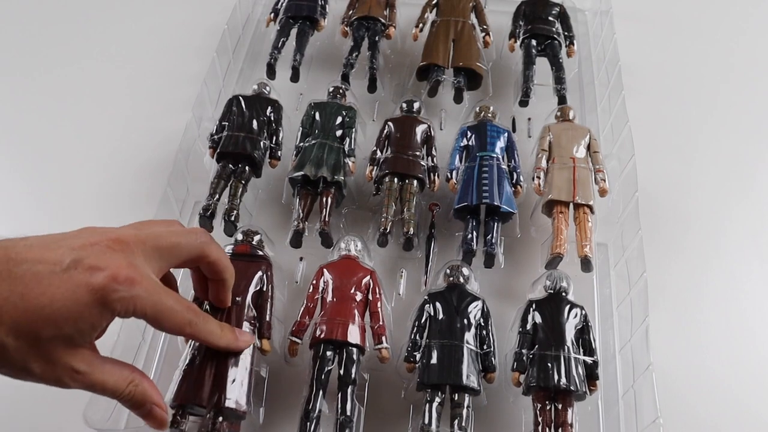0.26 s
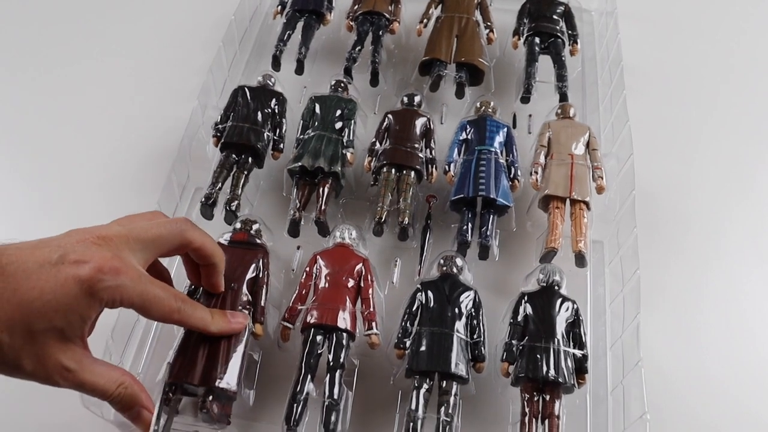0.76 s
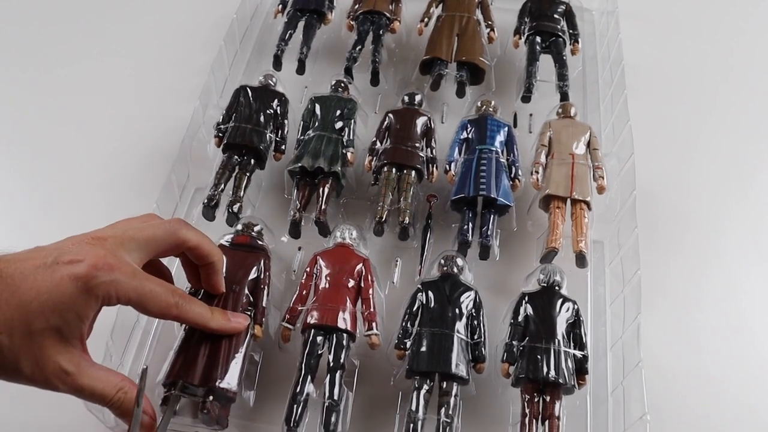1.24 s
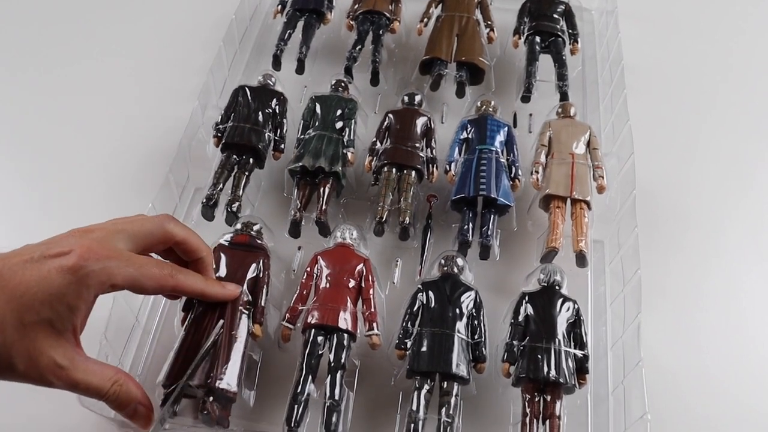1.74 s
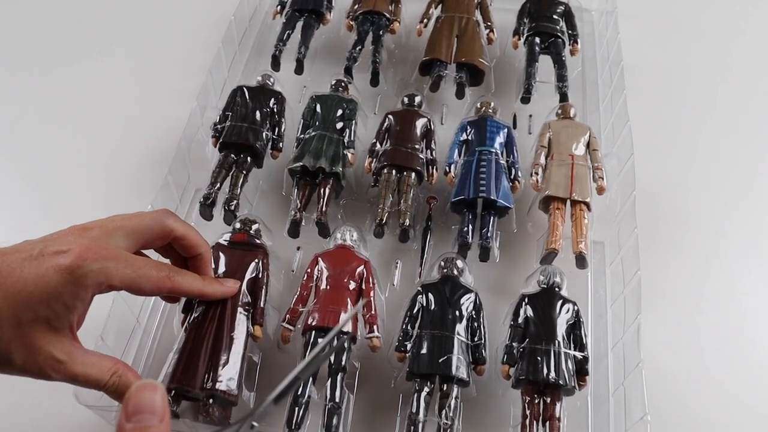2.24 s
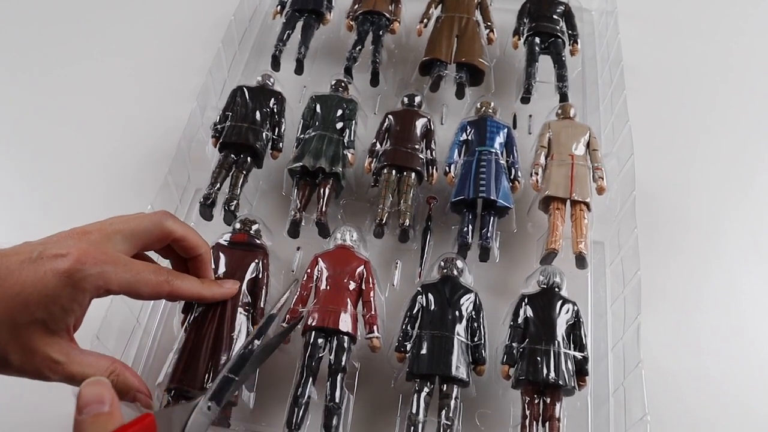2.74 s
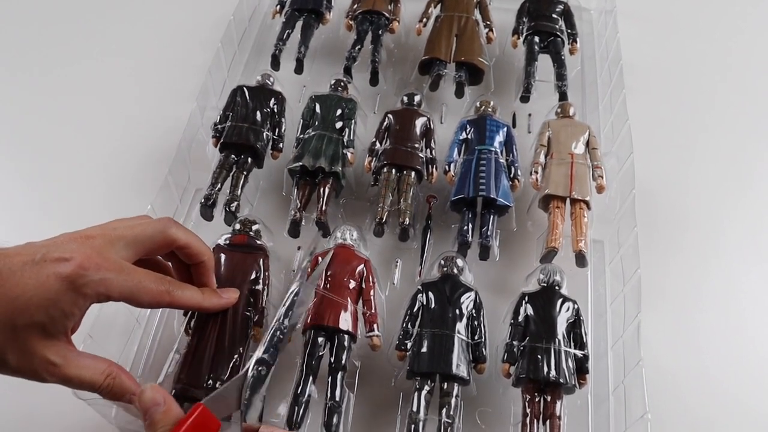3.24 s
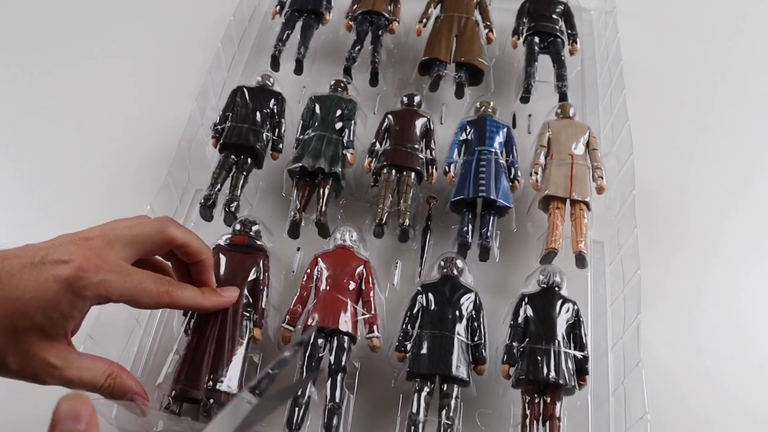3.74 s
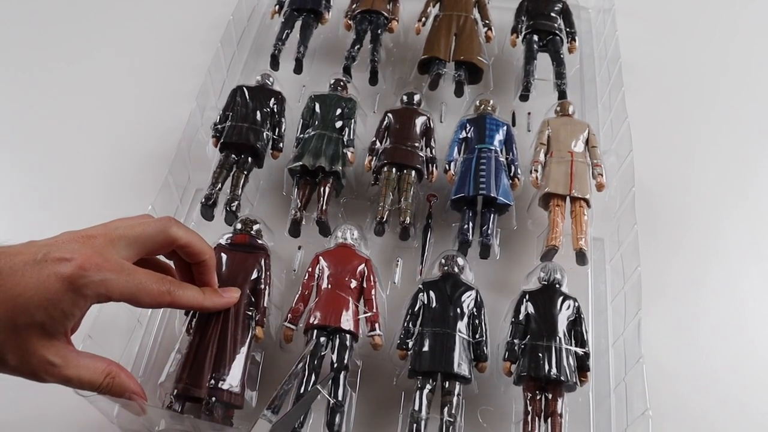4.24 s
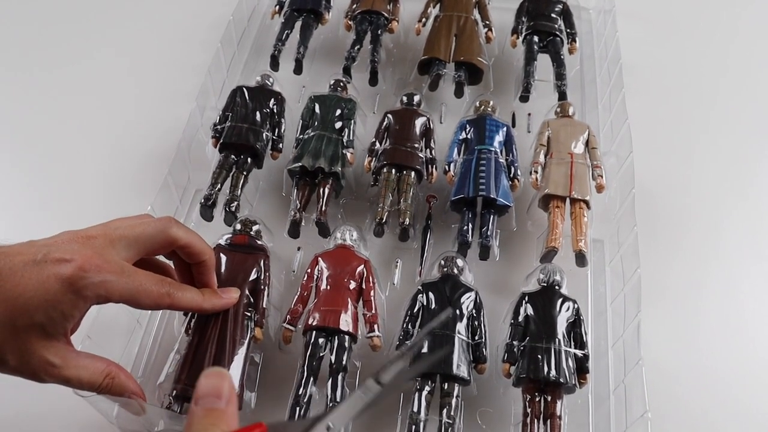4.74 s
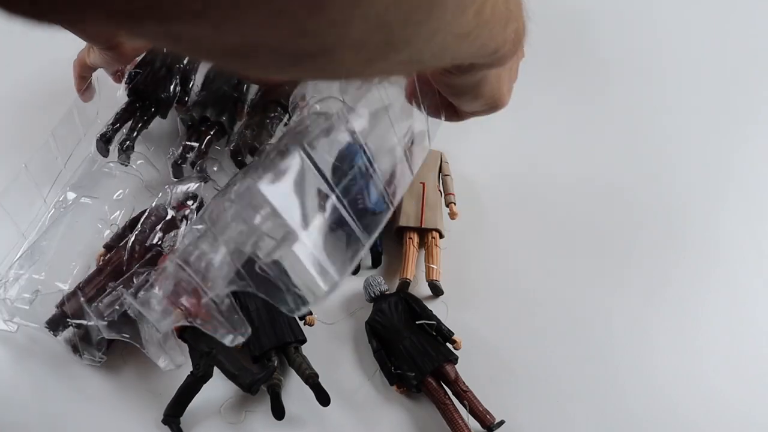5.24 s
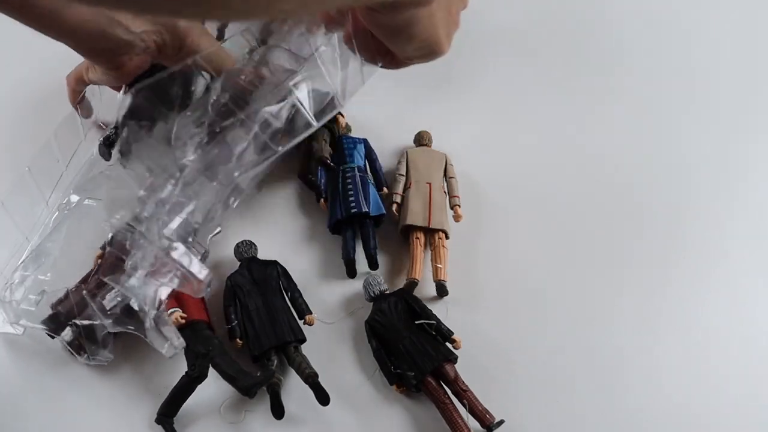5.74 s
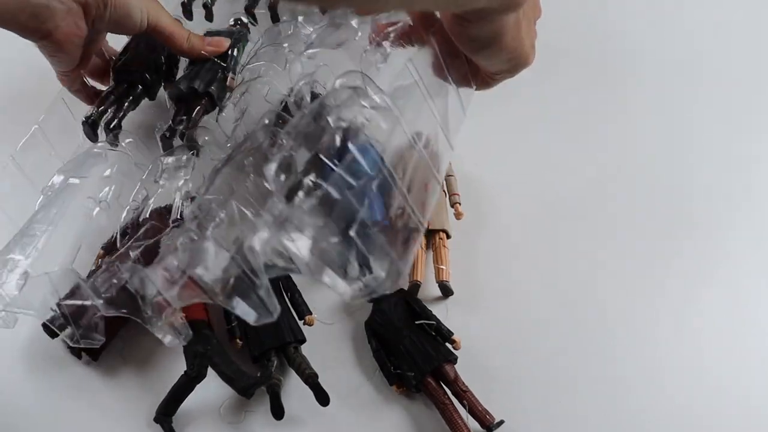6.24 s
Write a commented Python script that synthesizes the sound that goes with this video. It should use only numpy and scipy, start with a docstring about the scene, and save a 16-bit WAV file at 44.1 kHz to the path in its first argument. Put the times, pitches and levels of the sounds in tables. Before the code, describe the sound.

Brittle plastic sheet buckling in uneven clusters, each a short mid-pitched pop with a bright crease and small low thump. Brief scrapes and fine crinkling fill the gaps, thinning for moments near two and just before five seconds. Later flexing sounds slightly lower and hollow. Recorded close, in stereo, with short hard reflections and soft table thuds.

```python
"""A rigid plastic blister tray buckles as a hand presses it on a table and scissors snip ties;
then it is bent to shake figures out. Each buckle is a short burst with its own pitch, a bright crease and
a short low thump. Some dents ring clearly or give a sharp dry click; between buckles the sheet crackles,
scrapes and once hums. The tray's cavities and the table top ring when struck, and a small hard room
answers over a quiet room tone."""
import sys
import numpy as np
from scipy import signal
from scipy.fft import rfft, irfft, next_fast_len
from scipy.io import wavfile
from scipy.ndimage import uniform_filter1d

SR = 44100
rng = np.random.default_rng(int(sys.argv[2]) if len(sys.argv) > 2 else 0)


def to_wav(s):
    """Save 16-bit WAV."""
    ch = np.atleast_2d(s).T  # columns
    pcm = np.round(np.clip(ch, -1, 1) * 32767)  # PCM
    wavfile.write(sys.argv[1], SR, pcm.astype(np.int16))


N = 285649

# The sheet buckles or a tie is snipped: start_s, peak_db, pitch_hz, blow_db (into the cavities),
# bright_db (mean crease level, about 1.2-8.6 kHz), top_db (the same above about 5.6 kHz)
# [s, dB, Hz, dB, dB, dB]
BUCKLES = [(0.037, -21, 980, -44, -56, -48), (0.262, -18.5, 1590, -31.5, -34, -39.5),
           (0.359, -6, 1040, -34, -40, -41), (0.37, -9.5, 2320, -32, -36, -31),
           (0.445, -6, 1500, -17, -48, -41), (0.484, -33, 3500, -49, -28, -49),
           (0.497, -19, 1750, -36, -40, -60), (0.504, -10.5, 1340, -46, -47, -61),
           (0.511, -16, 1110, -57, -25, -43), (0.531, -27, 880, -20, -22.5, -20),
           (0.574, -16, 2940, -35, -30, -25.5), (0.592, -9.5, 2160, -28, -25, -35),
           (0.775, -11, 1100, -21, -18.5, -27.5), (0.852, -8, 1545, -25, -55, -50),
           (0.862, -8, 1500, -31, -37, -43), (0.886, -11.5, 905, -29.5, -51.5, -58),
           (0.916, -7.5, 1274, -27.5, -22.5, -27), (1.031, -8.5, 1070, -33, -19, -26),
           (1.08, -13, 980, -25.5, -57, -51), (1.155, -10, 1360, -29.5, -60.5, -61),
           (1.18, -7, 960, -29, -23, -32), (1.242, -2.5, 1300, -16.5, -47, -67),
           (1.264, -2, 1510, -32, -22, -30.5), (1.305, 0, 1330, -18.5, -11.5, -17.5),
           (1.507, -10, 725, -23, -32.5, -43), (1.591, -14.5, 2100, -33, -42, -37),
           (1.622, -8.5, 735, -31, -22, -27.5), (1.652, -7, 2220, -26, -39, -33),
           (1.783, -24, 1080, -46, -36, -41), (1.821, -3.5, 3720, -25, -9.5, -7.5),
           (1.948, -6.5, 1180, -31, -27, -37), (2.02, -44, 1040, -51, -32.5, -43),
           (2.077, -19, 5540, -55, -34.5, -19.5), (2.214, -22, 1670, -35, -33.5, -34),
           (2.396, -24, 1620, -41.5, -37.5, -44), (2.477, -23, 1580, -42, -32.5, -39),
           (2.711, -5, 1590, -29.5, -25, -32.5), (2.845, -6, 1600, -23, -50, -50),
           (2.853, -6, 1750, -29.5, -46, -52), (2.896, -22, 683, -35, -24.5, -28),
           (2.913, -22, 3800, -41, -31, -35), (2.948, -22, 1500, -30, -49, -55),
           (3.01, -14, 1540, -36, -41, -46), (3.017, -15, 700, -28, -38, -57),
           (3.05, -7, 820, -31, -56, -77), (3.088, -5, 2160, -30.5, -21, -29.5),
           (3.123, -4, 990, -44.5, -39.5, -28.5), (3.128, -11, 1470, -25, -45, -44),
           (3.142, 6.5, 2090, -37, -27, -26.5), (3.332, -1, 1100, -20, -9.5, -11.5),
           (3.355, -20, 1700, -34, -34, -48), (3.408, 2.5, 2050, -15.5, -14, -27),
           (3.724, -34, 1500, -58, -37, -42), (3.782, -22.5, 1070, -32, -70, -71),
           (3.872, -25.5, 1030, -38.5, -41.5, -50), (3.947, -15, 2470, -35, -49, -42),
           (4.043, -10, 2390, -30, -23, -30), (4.057, -2.5, 1750, -22.5, -43, -32),
           (4.086, -9, 1880, -33.5, -55, -41), (4.142, -15.5, 1700, -25, -26.5, -54),
           (4.216, -9.5, 1800, -33, -37, -56), (4.228, -23, 2600, -28.5, -31, -38.5),
           (4.29, -11.5, 3440, -61, -27, -26), (4.317, -13, 1810, -31, -23.5, -31),
           (4.348, -16.5, 1100, -28, -34, -36), (4.505, -9.5, 2100, -31, -13.5, -38),
           (4.513, 8, 1680, -30, -16.5, -6.5), (4.564, -13.5, 1080, -48, -28.5, -47),
           (4.582, -12.5, 1900, -37, -35, -51), (4.648, -19.5, 1660, -36.5, -32, -64),
           (4.875, -28.5, 666, -52, -48.5, -47), (4.944, -16.5, 680, -38, -37, -39),
           (4.968, -8.5, 1860, -26.5, -39, -56), (5.221, -5.5, 960, -27, -28, -39),
           (5.303, -15, 640, -53, -59, -65), (5.319, -8, 1730, -26, -25.5, -50),
           (5.343, -12.5, 1110, -56, -20.5, -21.5), (5.479, -11.5, 2450, -29, -57, -64),
           (5.521, -18, 1450, -35, -29.5, -54), (5.539, -6, 740, -32, -26, -35),
           (5.579, -12.5, 1210, -37, -58, -65), (5.615, -19, 1120, -31, -57, -60),
           (5.627, -14, 2510, -28.5, -28.5, -56), (5.676, -16, 1500, -21, -28, -35),
           (5.702, -6.5, 1630, -51, -24.5, -31), (5.864, -14.5, 1550, -69, -64, -58),
           (5.907, -13, 1570, -44, -45, -48), (5.99, -10, 1800, -36.5, -27, -25),
           (6.05, -16.5, 730, -35, -42, -56), (6.334, -27, 650, -31.5, -38.5, -44.5),
           (6.394, -12, 970, -32, -34, -42.5), (6.409, -9, 930, -38, -29, -48),
           (6.446, -5.5, 1600, -44, -25.5, -26.5)]


def amp(db):
    """Turn decibels into a gain."""
    return 10 ** (np.asarray(db) / 20)


def rms_one(x):
    """Scale to an rms of 1."""
    return x / np.sqrt(np.mean(x ** 2) + 1e-20)


def peak_one(x):
    """Scale to a peak of 1."""
    return x / (np.abs(x).max() + 1e-20)


def in_time(rows):
    """Read each column of a table between its points, with a value at every sample."""
    s, *columns = np.transpose(rows)
    return [np.interp(np.arange(N) / SR, s, column) for column in columns]


def at_hz(points, hz):
    """Read a table between its points, on a logarithmic pitch axis."""
    table_hz, values = np.array(points).T
    return np.interp(np.log(hz), np.log(table_hz), values)


def band(x, low_hz, high_hz):
    """Keep mainly the sound between two pitches."""
    edges = [low_hz, min(high_hz, .45 * SR)]
    return signal.sosfilt(signal.butter(2, edges, "band", fs=SR, output="sos"), x)


def ring(force, hz, t60):
    """A resonance: a unit click starts a sine of height 1 that falls 60 dB in t60 seconds."""
    decay, turn = amp(-60 / (t60 * SR)), 2 * np.pi * hz / SR
    return signal.lfilter([0, np.sin(turn)], [1, -2 * decay * np.cos(turn), decay * decay], force + 1e-18)


def stereo_noise(size, gain):
    """Noise in half-octave bands, more alike left and right in the bass; gain(hz) shapes each band."""
    # Left-right likeness of reflected sound: pitch_hz, likeness (1 = identical) [Hz, ratio]
    likeness = [(100, 0.86), (300, 1), (700, 0.45), (1500, 0.12), (3000, 0)]
    edges_hz = 30 * 2 ** np.arange(0, 9.3, .5)
    white = rng.standard_normal((2, 2, size))
    out = 0
    for k, (low, high) in enumerate(zip(edges_hz, edges_hz[1:])):
        mid, side = band(white[k % 2], low, high)
        hz = np.sqrt(low * high)
        alike = np.clip(at_hz(likeness, hz), -1, 1)
        stereo = np.sqrt(1 + alike) * mid + np.sqrt(1 - alike) * side * [[1], [-1]]
        out = out + gain(hz) * stereo
    return out


def strike(events, modes, spread_db, wander=0.0, late_pitch=1.0):
    """Every blow rings every mode with a random strength; pitches wander as the body flexes."""
    lift_s = 4.9      # from here on the pitches are multiplied by late_pitch
    size = SR // 2
    t, out = np.arange(size) / SR, np.zeros(N + size)
    hz, level_db, t60 = np.transpose(modes)[:, :, None]
    signs = (-1) ** np.arange(len(modes))[:, None]
    for s, db in events:
        strength, flex = rng.standard_normal((2, len(modes), 1))
        pitch = hz * np.exp(wander * flex) * (late_pitch if s > lift_s else 1)
        height = amp(db + level_db + spread_db * strength - 60 * t / t60)
        at = round(s * SR)
        out[at:at + size] += np.sum(signs * height * np.sin(2 * np.pi * pitch * t), axis=0)
    return out[:N]


def room_tone():
    """Steady stereo noise with the room's own colour, lower towards the end."""
    # Colour of the room tone: pitch_hz, relative level_db per Hz [Hz, dB]
    colour = [(35, -36.5), (60, 14), (294, 17), (666, 24.5), (785, -34), (7750, 6.5), (16000, -8.5)]
    level_db, late_s, late_drop_db = -57.5, 5.9, 8
    late = np.arange(N) > late_s * SR
    noise = stereo_noise(N, lambda hz: amp(at_hz(colour, hz)))
    return amp(level_db - late_drop_db * late) * rms_one(noise)


def table():
    """Pushes strike the table top's modes; shifting hands keep the same modes murmuring."""
    # Modes of the table top: pitch_hz, relative level_db, t60_s [Hz, dB, s]
    modes = [(112, -11, 0.75), (154.2, -2, 0.59), (183.6, 6, 0.22), (241, 5, 0.097)]
    # Pushes that reach the table: start_s, relative level_db [s, dB]
    thumps = [(0.449, -41.5), (0.529, -36), (1.304, -43.5), (1.499, -43), (2.715, -41), (2.849, -44),
              (3.321, -40), (3.41, -35), (4.089, -42.5), (4.219, -48), (4.509, -40.5), ]
    # Hands shifting on the table: time_s, level_db [s, dB]
    rumble = [(0.0, -53), (0.61, -48), (2.61, -53), (3.34, -52), (3.73, -58), (4.49, -50.5), (4.67, -56.5),
              (6.48, -65)]
    shifting = rng.standard_normal(N) + 0.5 * rng.standard_normal((2, N))
    fits_and_starts = rms_one(band(rng.standard_normal(N), 1.76, 14))
    shifting = shifting * amp(5.0 * fits_and_starts)
    murmur = sum(amp(db) * rms_one(ring(shifting, hz, 0.95 * t60)) for hz, db, t60 in modes)
    murmur = amp(in_time(rumble)[0]) * rms_one(band(murmur, 41, 290))
    blows = strike(thumps, modes, spread_db=5.5, wander=0.015)
    pushes = signal.lfilter([.04], [1, -.96], blows)      # soft contact dulls them
    return pushes * amp([[.3], [-.3]]) + murmur      # pushes are slightly louder on the left


def low_thumps():
    """Each buckle comes with a short low thump, far stronger for loud ones; a few dull thuds sound alike."""
    # Dull low thuds: start_s, relative level_db [s, dB]
    thuds = [(0.889, -24), (0.948, -19.5), (1.029, -29)]
    thump_db, follows, thump_s = -27, 2.3, 0.00095      # for a 0 dB buckle; dB per dB of buckle; seconds
    push, events = np.zeros((2, N)), np.array(BUCKLES)
    uneven_db = 4.2 * rng.standard_normal((len(events), 2)).T      # left and right each get their own share
    starts = (events[:, 0] * SR).astype(int)
    push[:, starts] = amp(thump_db + follows * events[:, 1] + uneven_db)
    for s, db in thuds:
        push[:, round(s * SR)] = amp(db + 4.1 * rng.standard_normal(2))
    rounded = signal.lfilter(np.hanning(round(thump_s * SR)), [1], push + 1e-18)
    return band(rounded, 15, 250)


def scrapes():
    """The sheet scrapes, crumples and once hums: clumped uneven slips in a band, with soft ends."""
    # Scrapes and crumples, and from 4.97 s a long hollow hum of the tray near 340 Hz: start_s, length_s,
    # level_db, centre_hz, spread (band edge over centre) [s, s, dB, Hz, ratio]
    stretches = [(0.356, 0.034, -31, 2390, 2.8), (0.589, 0.09, -27.5, 1300, 1.86),
                 (1.377, 0.16, -45.5, 1950, 3.4), (1.825, 0.16, -34.5, 4300, 1.8),
                 (2.466, .13, -38.5, 3530, 3.5), (3.057, 0.066, -26.5, 995, 1.08),
                 (3.142, 0.15, -34, 2210, 1.13), (3.398, 0.036, -15.5, 2120, 1.62),
                 (3.944, 0.084, -36, 1780, 2.3), (4.38, 0.12, -36.5, 2450, 1.85),
                 (4.55, 0.14, -41, 1870, 1.6), (4.938, 0.046, -27, 1290, 2.08),
                 (4.968, .8, -42, 340.3, 1.09), (5.143, 0.14, -35, 1150, 2.14),
                 (5.46, 0.055, -29, 1170, 1.67), (5.621, 0.071, -22.5, 1420, 2.7),
                 (5.784, 0.021, -28.5, 1750, 1.4), (6.35, 0.1, -33, 1190, 2.3)]
    edge_s, per_s, uneven_db, clump_db = 0.0068, 1400.0, 2.0, 3.0
    t, out = np.arange(SR) / SR, np.zeros(N + SR)
    for s, length, level_db, hz, spread in stretches:
        clumps = 2 * np.tanh(rms_one(band(rng.standard_normal(SR), 44, 290)) / 2)
        sizes = amp(uneven_db * np.minimum(rng.exponential(1, SR), 3) + clump_db * clumps)
        slips = sizes * rng.choice([-1, 1], SR) * (rng.random(SR) < per_s / SR)
        fade = np.clip(np.minimum(t, length - t) / edge_s, 0, 1)
        edges = hz / max(spread, 1.03), hz * max(spread, 1.03)
        coloured = band(band(slips, *edges), *edges)
        out[round(s * SR):][:SR] += amp(level_db) * fade * rms_one(coloured)
    return out[:N]


def crackle():
    """Small creases give way at random; each rings a few cycles in some patch of the sheet."""
    # Handling of the sheet: time_s, relative level_db, bright_db (extra treble) [s, dB, dB]
    handling = [(0.0, -50.5, 32), (0.31, -39.5, -4), (0.5, -31.5, 12), (0.96, -46, -4), (1.28, -37.5, 1.5),
                (1.89, -42, 9.5), (2.11, -54, 4.5), (2.44, -45.5, -9), (2.81, -44, 7.5), (3.03, -38.5, -11),
                (3.28, -41.5, 13), (3.39, -28, -11.5), (3.57, -45.5, -21.5), (3.82, -64.5, 28),
                (4.13, -50, -6.5), (4.51, -33.5, 11), (4.71, -72.5, 30.5), (4.94, -51.5, 4),
                (5.14, -34.5, 4), (5.55, -41.5, 5.5), (5.86, -36.5, -8), (6.11, -52, 5), (6.35, -46, -46),
                (6.48, -29.5, 22)]
    # Colour of the crackle: pitch_hz, relative level_db per Hz [Hz, dB]
    colour = [(88, -48), (150, 8), (264, -3.5), (334, -3.5), (484, 2.5), (689, 10), (3490, -4), (4950, -28),
              (16000, -27)]
    per_s, uneven_db, cycles = 4000.0, 1.5, 5.0
    level_db, bright_db = in_time(handling)
    sizes = amp(uneven_db * np.minimum(rng.exponential(1, N), 3.5)) * rng.choice([-1, 1], N)
    creases = sizes * (rng.random(N) < per_s / SR)
    # creases set one another off, so their strength comes in clumps
    clumps = [np.tanh(rms_one(band(white, 8.5, 37.0)) / 2) * 2 for white in rng.standard_normal((7, N))]
    out = 0
    for k, hz in enumerate(np.geomspace(250, 15000, 24)):
        high = np.clip(np.log2(hz / 1500) / 2, 0, 1)      # brightness acts from 1.5 kHz up
        clump_db = 5.5 * clumps[6] + 3.5 * clumps[k // 4]      # the whole sheet, and patches of like pitch
        chosen = rng.random((2, N)) < .15
        struck = creases * chosen * amp(level_db + high * bright_db + clump_db)
        struck[1] = np.where(hz < 2500, struck[0], struck[1])      # long waves are alike left and right
        # with a fixed number of cycles, lower rings have more energy in their band: hz evens this out
        out = out + amp(at_hz(colour, hz)) * hz * ring(struck, hz, cycles / hz)
    return amp(4.0) * out / np.sqrt(np.mean((out / amp(level_db)) ** 2))


def pops():
    """A dent pops through: a short rounded push rings one mode, long enough to sing or just a dry click."""
    # Dents that ring clearly, and sharp dry clicks: start_s, peak_db, pitch_hz, t60_s [s, dB, Hz, s]
    dents = [(0.357, -11.5, 1010, 0.059), (0.4972, -1.5, 1830, 0.0062), (1.835, -17.5, 1030, 0.038),
             (1.984, -16, 538, 0.034), (2.019, -11, 1083, 0.027), (3.058, -9, 1016, 0.028),
             (4.0569, -2, 1820, 0.0036), (4.0852, -0.5, 1920, 0.0098), (4.2152, -3, 1820, 0.0057),
             (4.3166, -5, 1840, 0.0098), (4.581, -2, 1930, 0.0087), (4.646, -17.5, 999, 0.069)]
    out = 0
    for s, peak_db, hz, t60 in dents:
        since_push = np.arange(N) / SR - s - .002
        push = np.exp(-.5 * (since_push / 0.000063) ** 2)
        out = out + amp(peak_db) * peak_one(ring(push, hz, t60))
    return out


def ticks():
    """The crease of each buckle: a very short bright burst, an uneven rattle and a faint settling rustle."""
    apart = 0.71      # share of noise that differs left and right
    t60, rise_s, top_t60, span_s = 0.0063, 0.00016, 1.0, .012      # crease levels are means over span_s
    rattle_db, rattle_t60, settle_db, settle_t60 = -6.0, 0.051, -28.0, 1.0
    facet_db, facet_cycles = -6.0, 12.3
    size, span = 11000, round(span_s * SR)
    t, out = np.arange(size) / SR, np.zeros((2, N + size))
    for s, *_, bright_db, top_db in BUCKLES:
        common, left, right, uneven = rng.standard_normal((4, size))
        rattle = amp(rattle_db - 60 * t / rattle_t60 + 3.7 * uniform_filter1d(uneven, size=60))
        settle = amp(settle_db - 60 * t / settle_t60) * (1 - t / t[-1])
        # creases lie all over the sheet, so the right side may hear them a few samples early or late
        common = np.array([common, np.roll(common, rng.integers(-4, 2))])
        noise = common + apart * np.array([left, right])
        burst = noise * (amp(-60 * t / t60) + rattle + settle) * (1 - np.exp(-t / rise_s))
        tinted = burst.copy()
        for hz in 2500 * 2 ** rng.uniform(0, 1.62, 4):      # nearby facets colour each crease
            facet = rms_one(ring(burst * amp(-60 * t / rattle_t60), hz, facet_cycles / hz))
            tinted += amp(facet_db) * np.std(burst) * facet
        bright = band(tinted, 1150, 8600)
        top = band(burst * amp(-60 * t / top_t60), 5630, 19500)
        at = round(s * SR)
        for db, part in (bright_db, bright), (top_db, top):
            out[:, at:at + size] += amp(db) * part / np.std(part[:, :span])
    return out[:, :N]


def snaps():
    """Each buckle: a dying burst of slips round its pitch, a flip, a ping and a blow into the cavities."""
    # Tray cavities: pitch_hz, relative level_db, t60_s [Hz, dB, s]
    cavities = [(354.6, 0.5, 0.028), (396.3, -3.5, 0.097), (436, -6, 0.1), (567.7, -1.5, 0.15),
                (688, -9, 0.19), (1040, 2.5, 0.055)]
    typical_t60, t60_spread = 0.037, 0.38      # seconds; spread of its logarithm
    spread, apart, rise_s = 1.577, 0.63, 0.00045      # band edge over pitch; left-right difference; seconds
    click, flip_s = 5.2, 0.001243      # the moment the dent flips
    ping_db, ping_share, ping_cycles = -2.5, 0.23, 14.0      # ping length: share of t60, at most so many cycles
    after_per_s, after_db, after_share = 500.0, 13.0, 2.7      # stray after-slips last longer than the burst
    size = 3500
    t, out = np.arange(size) / SR, np.zeros((2, N + size))
    first = 3.3 * np.exp(-t / 0.00062)      # the first slip is the sharpest
    for s, peak_db, hz, *_ in BUCKLES:
        t60 = typical_t60 * np.exp(t60_spread * rng.standard_normal())
        common, left, right, sizes = rng.standard_normal((4, size))
        noise = common + apart * np.array([left, right])
        slips = noise * (amp(-60 * t / t60) + first) * (1 - np.exp(-t / rise_s))
        stray = rng.random(size) < after_per_s / SR
        slips += sizes * amp(after_db - 60 * t / (after_share * t60)) * stray
        # the flip has a random strength and direction
        slips[:, round(flip_s * SR)] += click * amp(4.4 * np.tanh(left[0])) * np.sign(common[1])
        burst = peak_one(band(slips, hz / spread, hz * spread))
        ping = peak_one(ring(slips, hz, min(ping_share * t60, ping_cycles / hz)))
        at = round(s * SR)
        out[:, at:at + size] += amp(peak_db) * peak_one(burst + amp(ping_db) * ping)
    blows = np.array(BUCKLES)[:, [0, 3]]
    # held off the table and bent, the cavities ring lower
    hollow = strike(blows, cavities, spread_db=3.5, wander=0.045, late_pitch=.93)
    return out[:, :N] + hollow


def room(x):
    """A few distinct echoes, and a diffuse tail that dies faster in the treble."""
    # Decay of the room: pitch_hz, t60_s [Hz, s]
    decay = [(150, 0.68), (700, 0.49), (2000, 0.46), (5000, 0.4), (13000, 0.15)]
    # Echoes off table top and near walls: delay_s, level_db [s, dB]
    echoes = [(0.0103, -18), (.016, -20)]
    tail_db, onset_s = -11.5, 0.0019
    t = np.arange(int(.6 * SR)) / SR
    tail = stereo_noise(len(t), lambda hz: amp(-60 * t / at_hz(decay, hz)))
    tail = tail * np.clip(t / onset_s - 1, 0, 1)
    answer = amp(tail_db) * tail / np.sqrt(np.sum(tail ** 2) / 2)
    for s, db in echoes:
        answer[[0, 1], round(s * SR) + rng.integers(0, 4, 2)] += amp(db)
    return signal.fftconvolve(x, answer, axes=1)[:, :N]


def shade(x):
    """The microphone housing shades its left side, by an amount that changes with pitch."""
    # Left-right balance: pitch_hz, left minus right level_db [Hz, dB]
    balance = [(60, -12.5), (240, 0), (950, -2), (3770, -4), (15000, -3)]
    size = next_fast_len(N)
    hz = np.arange(size // 2 + 1) * SR / size + 1
    tilt_db = at_hz(balance, hz) / 2
    return irfft(rfft(x, size) * amp(tilt_db * [[1], [-1]]), size)[:, :N]


def scene():
    """The thin sheet radiates no bass, so its sounds are high-passed; the table's are not."""
    right_lag_s = .00005
    sheet = snaps() + pops() + ticks() + crackle() + scrapes()
    tray = signal.sosfilt(signal.butter(4, 230, "high", fs=SR, output="sos"), sheet)
    right = np.interp(np.arange(N) - right_lag_s * SR, np.arange(N), tray[1])
    direct = amp(-3.5) * np.array([tray[0], right])
    return shade(direct + room(direct)) + table() + low_thumps() + room_tone()


def record(dry):
    """The loudest snaps overload and are clipped flat; the treble is cut off steeply."""
    cutoff_hz = 16600
    overloaded = np.clip(dry, -.95, .95)
    low_pass = signal.cheby2(14, 60, cutoff_hz, fs=SR, output="sos")
    return np.clip(signal.sosfilt(low_pass, overloaded), -1, 1)


dry = scene()
out = record(dry)
to_wav(out)
```